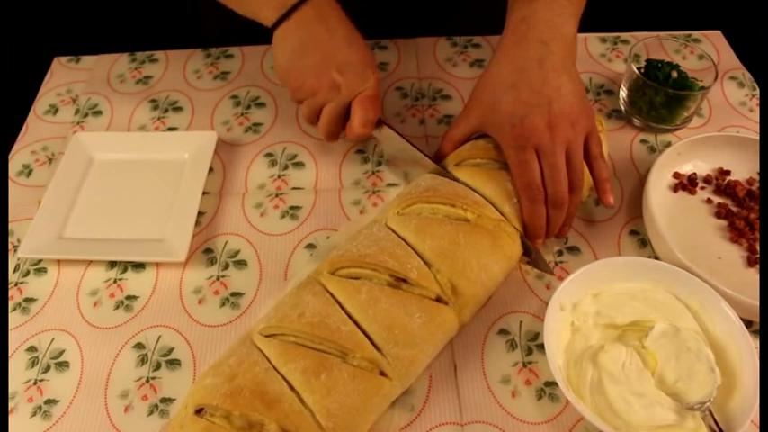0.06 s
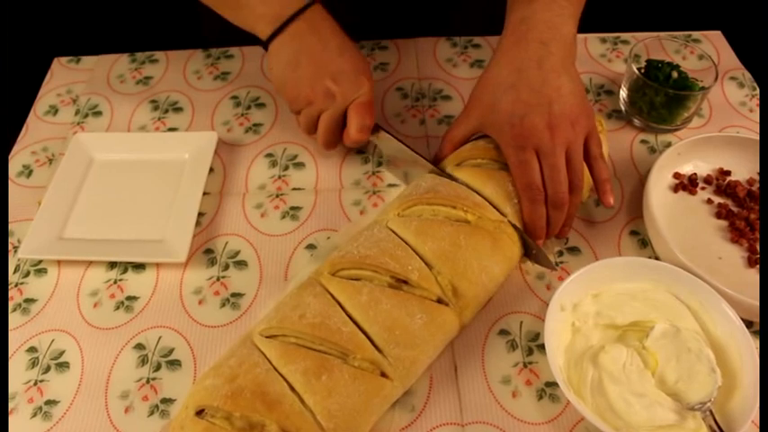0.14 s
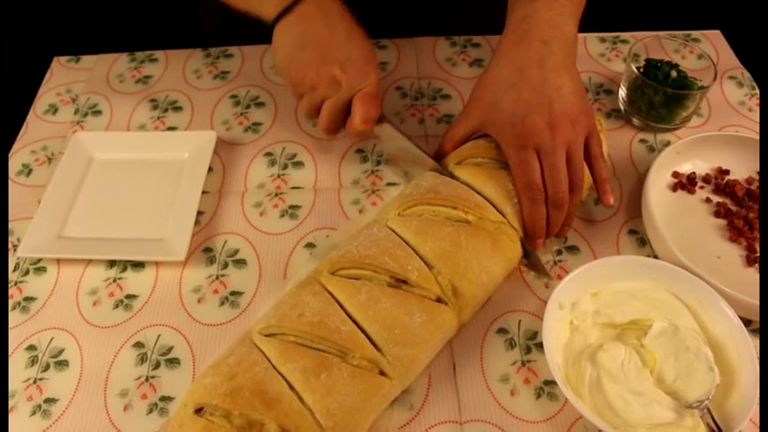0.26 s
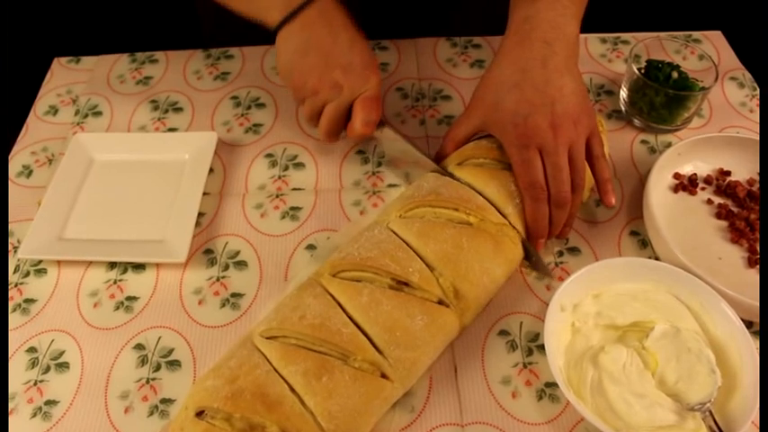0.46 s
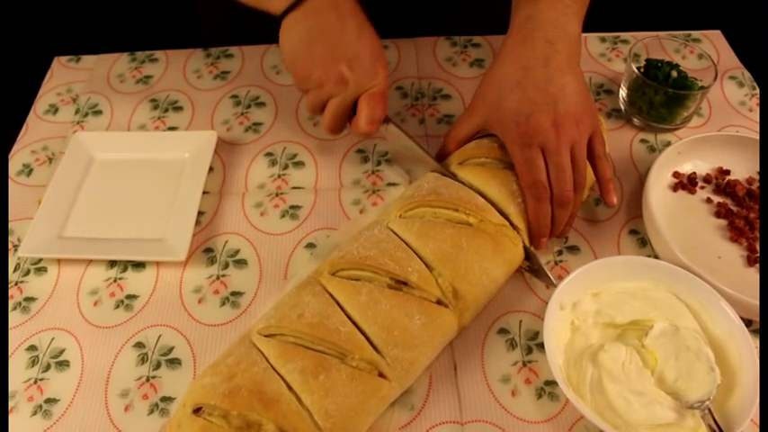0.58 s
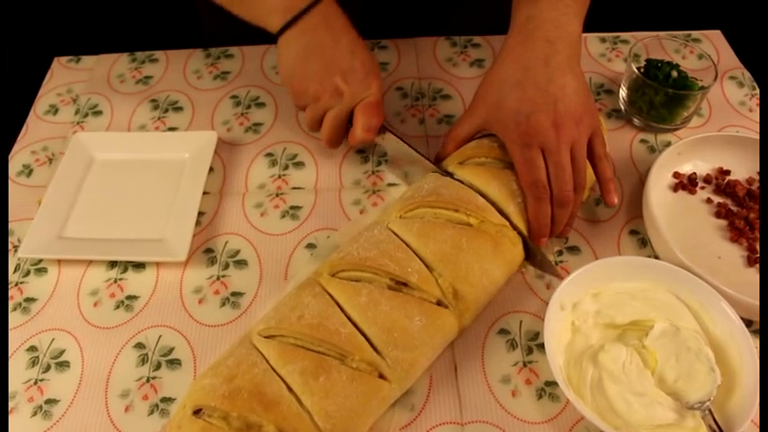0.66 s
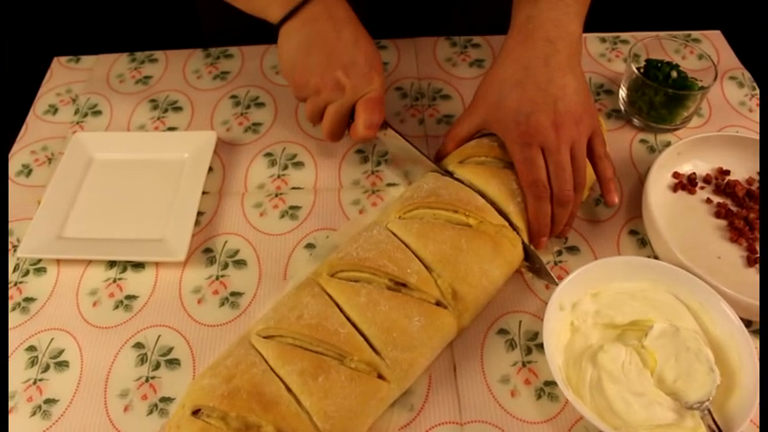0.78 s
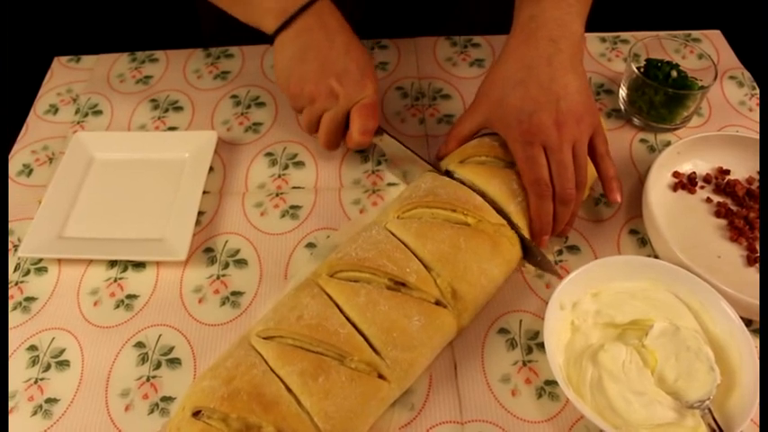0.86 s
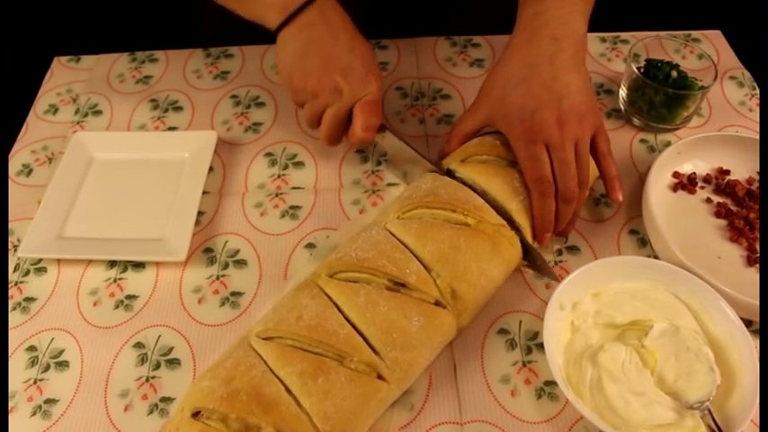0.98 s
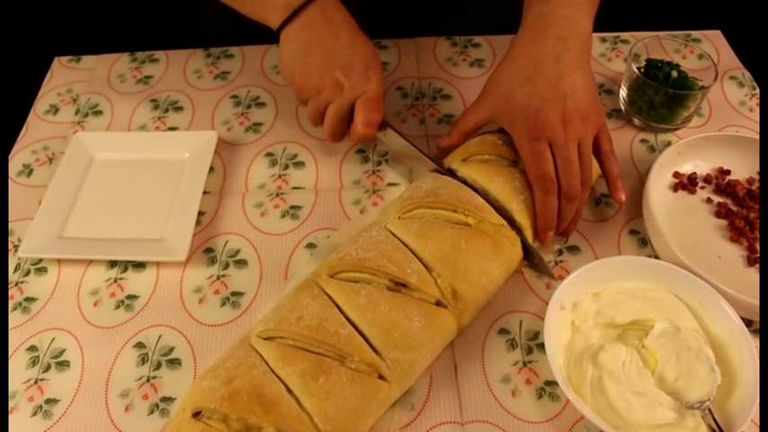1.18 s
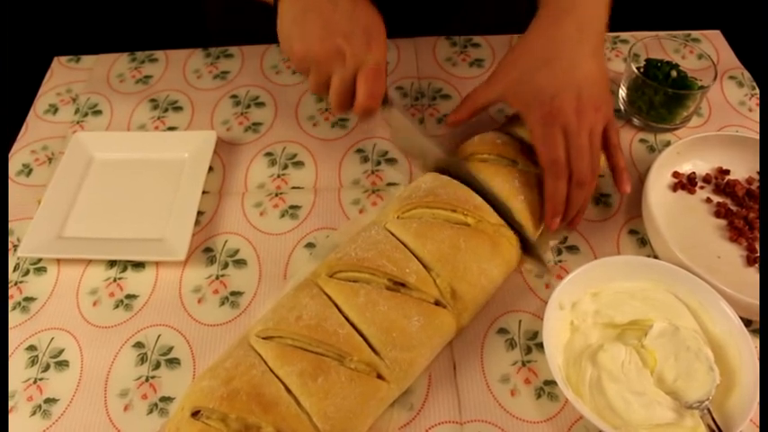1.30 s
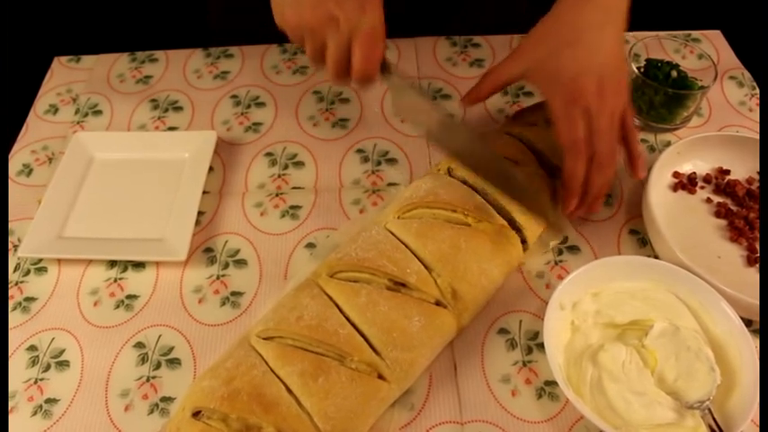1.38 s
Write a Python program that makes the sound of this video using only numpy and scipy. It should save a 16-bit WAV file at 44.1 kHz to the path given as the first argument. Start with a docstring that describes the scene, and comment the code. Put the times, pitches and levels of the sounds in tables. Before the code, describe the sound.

A knife saws through a crisp baked loaf, crust crackling, blade knocking on the table.

```python
"""A large knife saws through a crisp baked loaf on a table in a quiet, faintly humming kitchen.
The crust crackles from the first stroke, by brittle fracture. At 0.2 s and 0.6 s the blade knocks
down and excites the modes of the table; the second time the steel rings too. More snaps follow,
the loudest at 1.25 s as the slice comes away. Near surfaces and the room reflect cracks and knocks."""
import sys
import numpy as np
from scipy import signal
from scipy.fft import rfft, irfft
from scipy.io import wavfile

SR = 44100
rng = np.random.default_rng(int(sys.argv[2]) if len(sys.argv) > 2 else 0)


def wav_out(sig):
    """Save sig, one row per channel (or a flat mono array), as 16-bit PCM at SR to the path in sys.argv[1]."""
    wavfile.write(sys.argv[1], SR, np.round(np.clip(np.atleast_2d(sig).T, -1, 1) * 32767).astype(np.int16))


N = 63945
TAPS = 4096  # length of a pulse in samples
HZ = np.fft.rfftfreq(TAPS, 1 / SR)


def amp(db):
    """Amplitude ratio of a level in decibels."""
    return 10 ** (np.asarray(db) / 20)


def unit(x):
    """Normalisation to an rms of 1."""
    return x / np.sqrt(np.mean(x ** 2) + 1e-20)


def read(points, hz):
    """Interpolation of (f/Hz, value) points on a logarithmic frequency axis."""
    f, value = np.transpose(points)
    return np.interp(np.log(hz + 1), np.log(f + 1), value)


def add(mix, s, sound):
    """Superposition: a sound joins the mix at s seconds."""
    part = mix[max(round(s * SR), 0):][:len(sound)]
    part += sound[:len(part)]


def pulse(db):
    """Minimum phase: the most compact causal pulse with this spectrum."""
    log_gain = np.log(amp(np.maximum(db, -100)))
    mirrored = np.r_[log_gain, log_gain[-2:0:-1]]
    return np.fft.ifft(np.exp(np.conj(signal.hilbert(mirrored)))).real


def blow(hz, rise, fall, top_octaves, colour):
    """Unit-energy transient: a coloured spectral hump at hz, with rise and fall in dB per octave."""
    octaves = np.log2((HZ + 1) / hz)
    slope = np.where(octaves < 0, rise, fall)
    click = pulse(read(colour, HZ) - slope * (np.hypot(octaves, top_octaves) - top_octaves))
    return click / np.linalg.norm(click)


def cluster(per_s, decay_s, db):
    """A unit impulse, then a decaying Poisson swarm whose total energy is db relative to it."""
    t = np.arange(TAPS) / SR
    swarm = rng.choice([-1., 1.], TAPS) * (rng.random(TAPS) < per_s / SR) * np.exp(-t / decay_s)
    swarm *= amp(db) / (np.linalg.norm(swarm) + 1e-9)
    swarm[0] = 1
    return swarm


def diffuse(pair, colour):
    """Diffuse field: two independent noises are coloured and made coherent at long wavelengths."""
    # Left-right coherence: f/Hz, coefficient
    likeness = [(50, 0.74), (250, 0.86), (1000, 0.67), (2000, 0.58), (4000, 0.4), (12000, 0.11)]
    size = pair.shape[1]
    hz = np.fft.rfftfreq(size, 1 / SR)
    coherence = read(likeness, hz)
    a, b = rfft(pair)
    mid, side = a * np.sqrt((1 + coherence) / 2), b * np.sqrt((1 - coherence) / 2)
    return irfft(np.array([mid + side, mid - side]) * amp(read(colour, hz)), size)


def background():
    """Ambient sound: steady diffuse room noise and the pure tone of an appliance's hum."""
    # Noise spectrum: f/Hz, relative density level/dB
    floor = [(20, -20), (40, -22), (70, -7), (125, -8), (170, 2.5), (400, -5.5), (1000, -7.5),
             (3000, -15.5), (8000, -22.5), (15000, -32)]
    floor_db, hum_db, hum_hz = -52, -59.5, 127.5
    noise = unit(diffuse(rng.standard_normal((2, N)), floor))
    hum = np.sqrt(2) * np.sin(2 * np.pi * hum_hz * np.arange(N) / SR)
    return amp(floor_db) * noise + amp(hum_db) * hum


def sways():
    """Forced motion: the table top yields under the hands in low Gaussian tone bursts."""
    # Pushes: t/s, level/dB
    pushes = [(.225, -38), (.6, -54), (0.739, -47), (.82, -57), (.95, -53), (1.03, -66), (1.245, -51)]
    sway_hz, width_s = 58, 0.016
    t = np.arange(N) / SR
    return sum(amp(db) * np.exp(-((t - s) / width_s) ** 2) * np.sin(2 * np.pi * sway_hz * (t - s))
               for s, db in pushes)


def blade():
    """Free vibration: the steel rings after striking the table, damped by the loaf."""
    # Blade modes: f/Hz, level/dB, T60/s
    modes = [(836, -30, 0.39), (880, -26.5, 0.4), (906, -25.5, 0.38), (976, -26, 0.37), (1059, -27, 0.25),
             (1101, -33.5, 0.44)]
    strike_s, rise_s = 0.6005, 0.0027
    out, t = np.zeros(N), np.arange(SR // 2) / SR
    for hz, db, t60 in modes:
        envelope = (1 - np.exp(-t / rise_s)) * amp(db - 60 * t / t60)
        add(out, strike_s, envelope * np.sin(2 * np.pi * (hz * t + rng.random())))
    return out


def knocks():
    """Impact excitation: blade and loaf drive the table's damped modes and rattle what stands on it."""
    # Impacts: t/s, level/dB, centre f/Hz, relative ring/dB, relative rattle/dB, treble fall/(dB/octave)
    impacts = [(.074, -24, 396, -17, 2.5, 14), (0.188, -8.5, 328, -10, 7.5, 12.5),
               (0.2033, 7.5, 200, 3, -2.5, 24), (0.2048, 7, 499, -3.5, 2.5, 21),
               (0.213, 4, 210, -19, -1, 13), (.2255, -5, 606, 3, 7, 27), (.583, -3.5, 224, 2.5, 1.5, 11.5),
               (.598, 8.5, 366, -2, -17.5, 26.5), (.6002, 8, 1045, -2, -10.5, 28),
               (0.7, -14, 380, 4.5, 3.5, 23.5), (.733, -11.5, 497, -11, 6.5, 13.5),
               (0.9367, -16, 395, 5, -1, 14.5), (1.038, -18.5, 285, -14, 3, 26),
               (1.0498, -12, 266, -20, -19, 27.5), (1.189, -8, 627, -10, -14, 9),
               (1.223, -9.5, 650, -32, 4.5, 17.5), (1.234, -1, 356, -2.5, -9, 32.5)]
    # Table modes: f/Hz, relative level/dB, T60/s
    modes = [(75.9, -1, 0.52), (103.2, 4.5, 0.27), (198.3, 9, 0.15), (266, -0.5, 0.23), (382.6, -1, .3),
             (506.4, 6, 0.18), (588, 6.5, 0.097), (641, -0.5, 0.27), (738, 9.5, 0.19), (820, -6, 0.52),
             (885, -17, 0.72), (1126, -12, 0.25), (1420, 2, 0.2)]
    # Spectral colour of the table: f/Hz, level/dB
    colour = [(30, -0.5), (70, -3), (150, 0), (350, 3), (750, 0), (1300, 8.5), (1900, 2.5), (4000, 0),
              (12000, 12)]
    modes_db = -54.5
    out, t = np.zeros(N), np.arange(SR // 2) / SR
    ring = sum(amp(modes_db + db - 60 * t / t60) * np.cos(2 * np.pi * hz * t) for hz, db, t60 in modes)
    for s, db, hz, ring_db, rattle_db, fall in impacts:
        response = amp(ring_db) * ring
        add(response, 0, cluster(per_s=1200, decay_s=0.027, db=rattle_db))
        thud = blow(hz, rise=13.1, fall=fall, top_octaves=0.54, colour=colour)
        add(out, s, amp(db) * signal.fftconvolve(thud, response))
    return out


def sawing():
    """Shot noise: thousands of tiny fractures under the moving blade merge into a crackle."""
    # Envelope of the strokes: t/s, level/dB
    strokes = [(0, -59), (0.052, -61), (0.073, -46), (.12, -50.5), (.17, -54.5), (.42, -60.5), (.55, -50),
               (.68, -47.5), (0.734, -36), (.79, -53.5), (0.858, -54.5), (.92, -45), (0.971, -50.5),
               (1.081, -47.5), (1.166, -63), (1.212, -39), (1.3, -49.5), (1.45, -60)]
    # Spectrum of one fracture: f/Hz, relative density level/dB
    spectrum = [(100, -8), (400, 9.5), (1200, 0.5), (2800, 7), (5000, -1.5), (8000, -5.5), (12000, -14.5),
                (16000, -23)]
    fractures_per_s, spread_db = 1500, 4
    sizes = amp(spread_db * np.minimum(rng.exponential(1, N), 4)) * rng.choice([-1., 1.], N)
    fractures = sizes * (rng.random(N) < fractures_per_s / SR)
    crackle = signal.fftconvolve(fractures, pulse(read(spectrum, HZ)))[:N]
    return unit(crackle) * amp(np.interp(np.arange(N) / SR, *np.transpose(strokes)))


def snaps():
    """Brittle fracture: each break of the crust radiates a sharp click, and tinier breaks follow."""
    # Breaks: t/s, level/dB, centre f/Hz, relative crumbling/dB, treble fall/(dB/octave)
    breaks = [(0.0746, -33, 2160, -14, -4), (0.0747, -20, 4600, 0, 10.5), (0.089, -14, 3830, 3, 21.5),
              (.113, -30, 7200, 3.5, 13), (0.1923, -20.5, 2000, 6.5, 5), (0.204, -5.5, 2290, 0, 17.5),
              (0.3283, -24, 9000, -12, 23), (0.505, -31.5, 3200, 4, 29), (.554, -25.5, 5030, -11, 25),
              (0.5977, -10.5, 3680, -2.5, 16), (0.7025, -12.5, 3130, -1.5, 27), (.7325, -9, 2950, 2, 23.5),
              (.832, -29.5, 8200, 2.5, 27), (.877, -30.5, 7100, 4.5, 26), (0.9198, -9.5, 2650, -24, 25),
              (0.9356, -10, 2930, 1.5, 21), (0.9378, 0, 2590, -4, 15), (0.97, -24, 6480, 0, 14),
              (1.074, -24, 4570, -11, 10), (1.0789, -19.5, 5000, -13, 9), (1.1817, -24.5, 2400, -3, 26),
              (1.1877, -9.5, 2240, -1, 14), (1.1886, -4.5, 2120, -3, 16), (1.1958, -13, 2000, 5.5, 20),
              (1.224, -13, 3880, -2.5, 15), (1.2249, -4.5, 2320, -5, 12), (1.2472, 6, 3440, -4, 28.5),
              (1.2519, -29, 3360, 1, 22), (1.3743, -18, 6960, -6, 48)]
    # Spectral colour of the crust: f/Hz, level/dB
    colour = [(100, -7), (400, 18.5), (1000, 6.5), (2000, 5.5), (3500, 4), (6000, 3), (9000, 3),
              (15000, -4)]
    out = np.zeros(N)
    for s, db, hz, crumble_db, fall in breaks:
        click = blow(hz, rise=9.3, fall=fall, top_octaves=0.56, colour=colour)
        crumbling = cluster(per_s=2700, decay_s=0.0051, db=crumble_db)
        add(out, s, amp(db) * signal.fftconvolve(click, crumbling))
    return out


def kitchen(x):
    """Reverberation: convolution with the direct path, early reflections and a decaying diffuse tail."""
    # Reverberation time: f/Hz, T60/s
    room_t60 = [(100, 0.62), (300, 0.43), (1000, 0.45), (3000, 0.48), (6000, 0.35), (14000, 0.1)]
    # Spectrum of the tail: f/Hz, level/dB
    tail_colour = [(80, -10.5), (200, -10.5), (400, -8), (1000, -2), (2000, -3), (4000, -1.5), (7000, -2.5),
                   (14000, 5.5)]
    # Early reflections: left t/s, right t/s, left level/dB, right level/dB
    echoes = [(.00305, .00316, -5.5, -11.5), (.0055, .00544, -11.5, -6.5)]
    # Spectrum of a reflection: f/Hz, level/dB
    echo_colour = [(200, -12), (1500, -9), (3000, -1.5), (8000, 4)]
    onset_s = 0.0031
    hz, t, noise = signal.stft(rng.standard_normal((2, SR)), SR, nperseg=256)
    fade = amp(-60 * t / read(room_t60, hz)[:, None])
    fade /= np.sqrt((fade ** 2).sum(1, keepdims=True) * t[1] * SR)  # equal energy in every band
    response = diffuse(signal.istft(noise * fade, SR, nperseg=256)[1], tail_colour)
    response *= 1 - np.exp(-(np.arange(response.shape[1]) / SR / onset_s) ** 2)
    response[:, 0] += 1  # direct path
    bounce = pulse(read(echo_colour, HZ))
    for left_s, right_s, left_db, right_db in echoes:
        add(response[0], left_s, amp(left_db) * bounce)
        add(response[1], right_s, amp(right_db) * bounce)
    return signal.fftconvolve(x[None], response, axes=1)[:, :N]


def scene():
    """Superposition: reverberant crust and knocks, plus the blade's ring, the sways and the background."""
    return kitchen(snaps() + knocks() + sawing()) + blade() + sways() + background()


def record(dry):
    """Linear filtering: a slightly uneven microphone pair, then a low-pass band limit."""
    # Channel imbalance: f/Hz, left minus right level/dB
    balance = [(50, 2.5), (250, -1.4), (500, -2.5), (1000, -3), (2000, -2), (4000, 0.5), (9000, -0.5)]
    cutoff_hz = 15900
    lean_db = read(balance, HZ) / 2
    heard = signal.fftconvolve(dry, np.array([pulse(lean_db), pulse(-lean_db)]), axes=1)[:, :N]
    low_pass = signal.firwin(511, cutoff_hz, window=("kaiser", 9), fs=SR)
    return signal.oaconvolve(heard, low_pass[None], "same")


dry = scene()
out = record(dry)
wav_out(out)
```